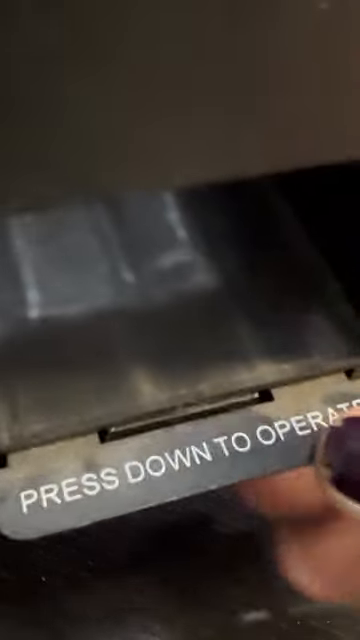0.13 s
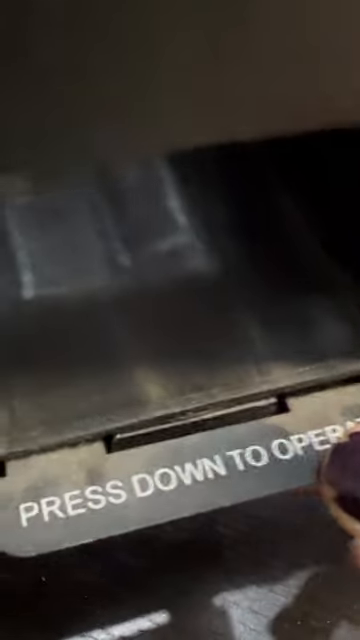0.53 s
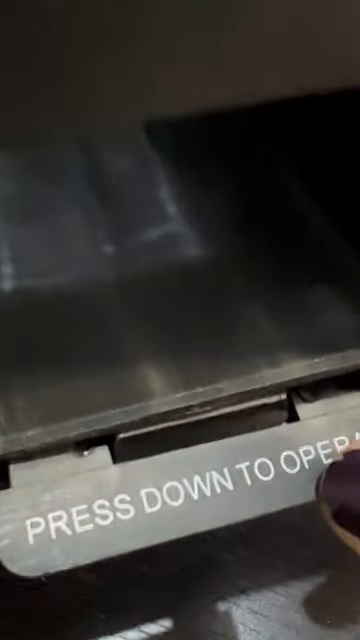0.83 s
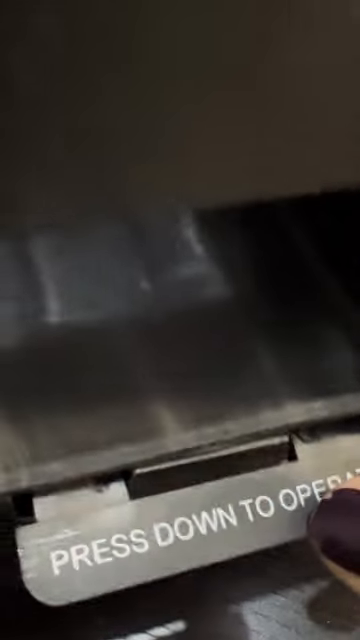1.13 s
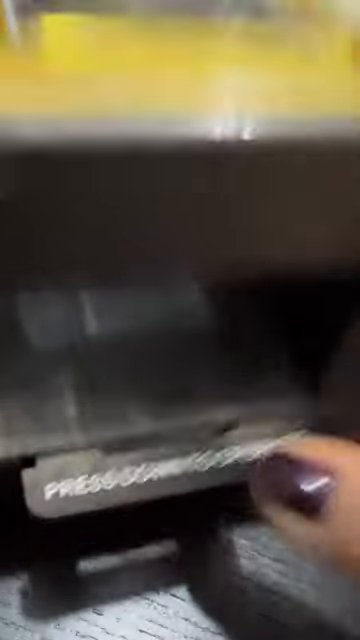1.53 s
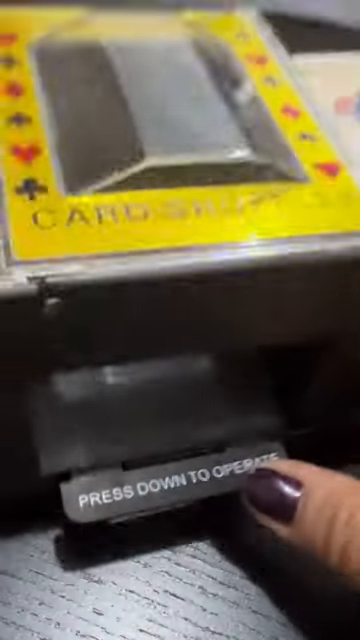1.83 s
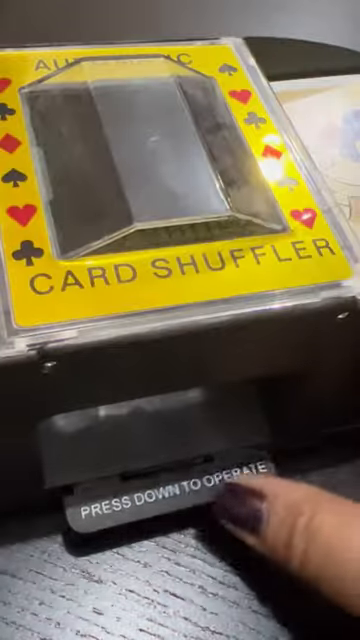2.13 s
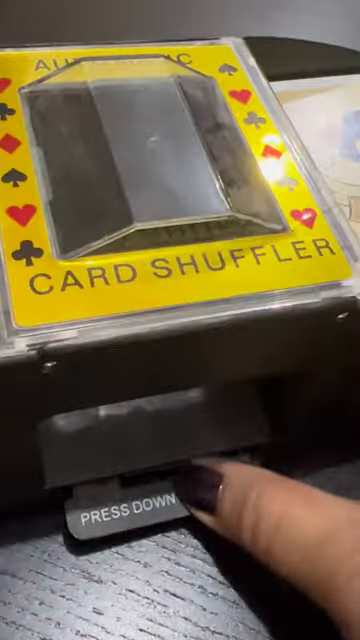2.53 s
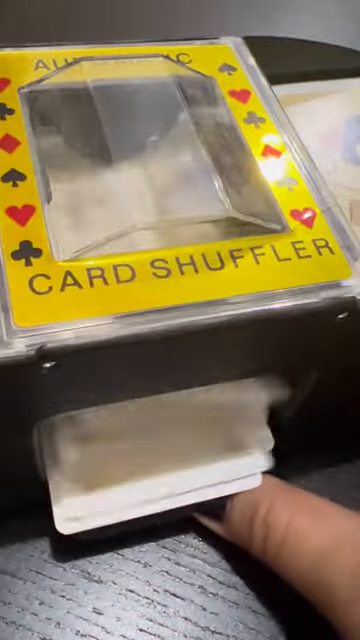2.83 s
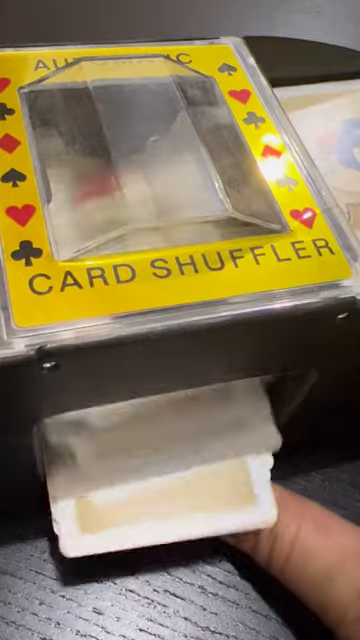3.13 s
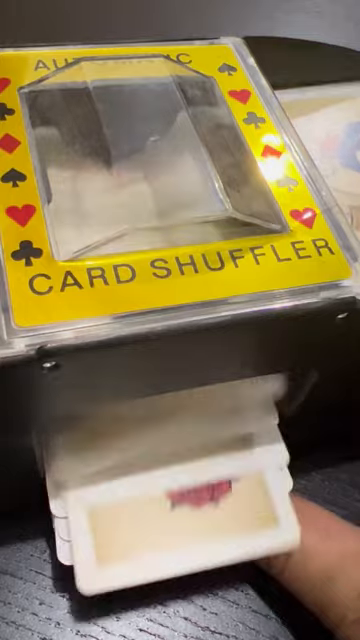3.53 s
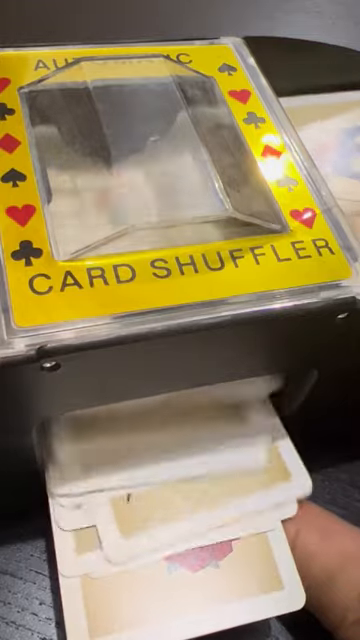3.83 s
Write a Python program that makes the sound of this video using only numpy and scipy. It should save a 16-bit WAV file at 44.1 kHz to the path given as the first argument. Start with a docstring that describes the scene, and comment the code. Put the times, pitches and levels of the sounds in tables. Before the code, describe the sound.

A battery card shuffler, heard close on a phone in a quiet room. Light plastic taps and faint hand rubbing run from 0 to 1.4 s, with a clack at 1.47 s and tiny high squeaks around 1.4-1.7 s. Hard hollow knocks hit the table at 1.92-2.02 s, then near quiet. At about 2.54 s the motor bursts in, rattling and scraping, with irregular papery card snaps until the end at 4 s.

```python
"""A hand slides over plastic in a quiet room and fingers tap and shift the housing of a battery card shuffler.
It stands on a table, close to a hand-held phone, and knocks down hard on the table top; small squeaks sound high.
Then the lever starts the motor: gears rattle the housing while feed wheels scrape and flick cards into the tray.
Noise bursts and gear clicks ring the decaying modes of housing and table; slides and scrapes are coloured noise."""
import sys
import numpy as np
from scipy import signal
from scipy.fft import rfft, irfft
from scipy.io import wavfile
from scipy.ndimage import uniform_filter1d

SR = 44100
rng = np.random.default_rng(int(sys.argv[2]) if len(sys.argv) > 2 else 0)


def gain_from_db(level_db):
    """Turn a decibel level (scalar or array-like) into a linear amplitude factor."""
    decades = np.asarray(level_db, float) / 20
    return 10 ** decades


def store_pcm(level_fs):
    """Save levels as 16-bit WAV."""
    pcm = np.round(np.clip(level_fs, -1, 1) * 32767).astype(np.int16)
    wavfile.write(sys.argv[1], SR, np.atleast_2d(pcm).T)


N = 176400

# modes of the table top, before any damping: (pitch [Hz], level [dB], decay time t60 [s])
TABLE_MODES = [(79.6, -7, 0.28), (115, 1.5, 0.14), (144.5, 1, 0.48), (201, -7, 0.03), (275, 13.5, 0.028)]
# motor drive: (time [s], gear rattle level [dB], card scrape level [dB])
MOTOR_DRIVE = [(2.52, -70, -50), (2.538, -25, -30), (2.548, -15, -20.5), (2.568, -11, -20.5),
               (2.61, -16, -18.5), (2.63, -22, -21), (2.8, -21.5, -26), (2.86, -19, -22.5),
               (2.98, -22, -26), (3.12, -24.5, -21), (3.18, -25, -25), (3.26, -21, -21.5), (3.34, -23, -26),
               (3.45, -24, -23), (3.56, -23.5, -23.5), (3.62, -25, -27), (3.68, -24, -23.5),
               (3.85, -27, -25.5), (4., -26.5, -24.5)]
GEAR_DAMPING = 0.47  # share of the housing's free decay time left while the gears run


def curve(table, column=1):
    """A table column joined by straight lines in time."""
    rows = np.array(table, float)
    return np.interp(np.arange(N) / SR, rows[:, 0], rows[:, column])


def gain(table, size):
    """Gain per frequency bin from (pitch [Hz], level [dB]) points, joined over log pitch."""
    rows = np.array(table, float)
    hz = np.arange(size // 2 + 1) * SR / size
    return gain_from_db(np.interp(np.log(hz + 1), np.log(rows[:, 0]), rows[:, 1]))


def unit(x):
    """Scale to rms 1."""
    return x / np.sqrt(np.mean(x ** 2))


def walk(rate):
    """Random wander of spread 1; a higher rate [Hz] wanders faster."""
    k = int(SR / rate)
    return unit(uniform_filter1d(uniform_filter1d(rng.standard_normal(N), k), k))


def hiss(colour):
    """Stereo noise of a given colour, wider in the treble."""
    # (pitch [Hz], side level above mid [dB])
    side_levels = [(50, -21), (250, -20), (500, -4), (2000, -6.5), (4000, -2.5), (12000, -5.5)]
    mid = rfft(rng.standard_normal(N)) * gain(colour, N)
    side = rfft(rng.standard_normal(N)) * gain(colour, N) * gain(side_levels, N)
    return unit(np.array([irfft(mid + side, N), irfft(mid - side, N)]))


def patchy(x, db, rate):
    """Each band of a noise flickers on its own, by a spread in dB."""
    # edges of the flickering bands [Hz]
    edges = [20, 700, 1500, 3000, 4500, 6500, 8500, 11000, 13500, 19000]
    spectrum = rfft(x)
    hz = np.arange(N // 2 + 1) * SR / N
    out = np.zeros_like(x)
    for lo, hi in zip(edges, edges[1:]):
        patch = irfft(spectrum * (hz >= lo) * (hz < hi), N)
        out += patch * gain_from_db(db * walk(rate))
    return out


def band(x, lo_hz, hi_hz):
    """Band-pass."""
    return signal.sosfilt(signal.butter(2, [lo_hz, hi_hz], "band", fs=SR, output="sos"), x)


def wide(row, share=0.36):
    """Two partly alike channels from one noise row and its reverse."""
    return row + share * row[::-1] * np.array([[1], [-1]])


def burst(rise, fall, size=4096):
    """Envelope that swells over rise [s], then dies away by a factor e per fall [s]."""
    t = np.arange(size) / SR
    swell = np.sin(np.pi / 2 * np.minimum(t / max(rise, 1e-4), 1)) ** 2
    return swell * np.exp(-np.maximum(t - rise, 0) / max(fall, 1e-4))


def add(out, s, x, db):
    """Mix a sound in, starting at s, with a given peak level."""
    i = int(s * SR)
    x = x[..., :N - i]
    out[:, i:i + x.shape[-1]] += x * gain_from_db(db) / np.abs(x).max()


def ring(x, hz, t60):
    """One decaying mode, struck by x."""
    pole = np.exp(2j * np.pi * hz / SR - np.log(1000) / (t60 * SR))
    return signal.lfilter([1], [1, -pole], x).imag


def table_top(x, damping=1):
    """The table top rings in its own modes; damping scales their decay times."""
    return sum(gain_from_db(db) * ring(x, hz, t60 * damping) for hz, db, t60 in TABLE_MODES)


def housing(x, centre_hz, octaves, damping, tune=0.97):
    """The housing rings near the pitch its contact favours, retuned by load; being small, it gives off no bass."""
    # modes, free of load and damping: (pitch [Hz], level [dB], decay time t60 [s], left above right [dB])
    modes = [(428, -16, 0.013, -1), (502, 7.5, 0.072, -5.5), (566, 11.5, 0.033, 3.5),
             (822, 10.5, 0.024, -5.5), (998, 14, 0.042, -3), (1270, 17, 0.016, 1.5), (1597, 17.5, 0.03, 1),
             (2250, 9.5, 0.018, -1), (2394, 16, 0.03, 1.5), (2550, 11.5, 0.051, 1.5), (3200, 10, 0.022, -4),
             (3470, 11, 0.014, 20), (4800, 4, 0.0077, -13)]
    out = 0
    for hz, db, t60, pan in modes:
        favour = np.exp(-.5 * (np.log2(hz / centre_hz) / octaves) ** 2)
        sides = gain_from_db(np.array([[pan], [-pan]]) / 2)
        out = out + gain_from_db(db) * favour * ring(x, hz * tune, t60 * damping) * sides
    return band(out, 348, 10000)


def room():
    """Low room tone: coloured noise whose level drifts a little."""
    # (pitch [Hz], level per Hz [dB])
    colour = [(25, 9.5), (55, 7.5), (90, -1.5), (269, -1), (451, -7.5), (648, -12), (756, -12),
              (1270, -17.5), (3050, -23), (5000, -36), (8000, -47), (12000, -74), (16000, -90)]
    return hiss(colour) * gain_from_db(-47.5 + 0.21 * walk(9.3))


def hand_slide():
    """The hand slides over case and cards: flickering friction noise that stops as the motor starts."""
    # (time [s], level before flicker and wander [dB])
    levels = [(0., -53), (.09, -64.5), (.13, -75), (.6, -82), (.68, -60), (.76, -72), (.97, -82),
              (1.02, -55.5), (1.07, -83), (1.15, -63.5), (1.23, -58.5), (1.28, -93), (1.34, -56),
              (1.43, -60), (1.47, -36.5), (1.52, -53.5), (1.65, -48), (1.78, -54.5), (1.83, -44),
              (1.9, -75), (1.94, -24), (1.98, -46), (2.02, -34), (2.07, -59.5), (2.17, -65.5), (2.26, -54),
              (2.34, -53), (2.42, -66.5), (2.5, -61)]
    # (pitch [Hz], level per Hz [dB])
    colour = [(400, -8), (800, 8), (2200, 5.5), (4000, 2.5), (8000, 0.5), (15000, -6.5)]
    friction = patchy(hiss(colour), 2.2, 46)
    slide = friction * gain_from_db(curve(levels) + 2 * walk(240))
    return slide * (np.arange(N) < MOTOR_DRIVE[1][0] * SR)


def echo(near):
    """A short dull echo: the near sound convolved with dying low noise."""
    level_db, t60_s, dull_hz = -27, .3, 330
    t = np.arange(SR // 2) / SR
    tail = band(wide(rng.standard_normal(len(t)), 0.14), 83, dull_hz)
    tail = tail * gain_from_db(-60 * t / t60_s) * (t > .006)  # nothing returns in the first 6 ms
    tail = tail / np.sqrt(np.sum(tail ** 2) / 2)
    return gain_from_db(level_db) * signal.fftconvolve(near, tail, axes=1)[:, :N]


def taps():
    """Fingers and knocks rub and strike the housing, which rings, with a brighter crack of noise."""
    # (time [s], ring peak [dB], crack above ring [dB], loudest pitch [Hz], contact [s])
    contacts = [(0.15, -41, -20, 480, 0.004), (0.043, -32.5, -10, 520, 0.0032),
                (0.081, -37, -8, 480, 0.0059), (0.183, -35.5, 8.5, 1050, 0.0039),
                (0.373, -36, -28, 443, 0.0046), (0.555, -24.5, 2.5, 800, 0.0039),
                (0.609, -40.5, -2, 498, 0.0053), (0.628, -34.5, 2, 560, 0.0079),
                (0.669, -30, -8, 447, 0.0042), (0.759, -35, -24, 460, 0.0051),
                (0.89, -31.5, -32, 520, 0.0038), (1.015, -27.5, -32, 690, 0.0032),
                (1.024, -27.5, -23, 537, 0.005), (1.156, -30.5, -12, 503, 0.0047),
                (1.186, -28.5, -12.5, 690, 0.0035), (1.198, -35.5, -14, 475, 0.0032),
                (1.223, -29, -20, 482, 0.0026), (1.284, -32.5, -21, 436, 0.0016),
                (1.358, -34.5, -6, 520, 0.0036), (1.391, -37.5, -9, 555, 0.012),
                (1.427, -41.5, 9, 462, 0.0091), (1.459, -23.5, -3, 1190, 0.01),
                (1.467, -8, -3, 926, 0.0037), (1.641, -44.5, 7, 433, 0.002), (1.73, -33, -17, 453, 0.0039),
                (1.881, -26.5, 9.5, 835, 0.0019), (1.92, -6, -1.5, 450, 0.0054),
                (1.937, -2.5, -3.5, 480, 0.0041), (1.944, -9, -21, 465, 0.0029),
                (1.961, -16, -4, 467, 0.0032), (2.013, -8.5, -46, 1080, 0.0019),
                (2.016, 1, -14.5, 426, 0.00349), (2.059, -44, -10, 420, 0.0045),
                (2.269, -47, 5, 450, 0.0024), (2.48, -40, -2.5, 516, 0.0023)]
    out = np.zeros((2, N))
    for s, db, crack_db, hz, contact in contacts:
        row = rng.standard_normal(4096)
        rub = row * burst(1.2 * contact, contact)
        blow = 1.5 * np.roll(burst(0.00031, 0.00011), int(contact * SR / 2))  # strikes half a contact in
        body = housing(rub + blow, hz, 0.86, damping=.6)
        add(out, s - .002, band(body, hz / 1.64, hz * 1.49), db)
        crack = wide(row) * burst(0.29 * contact, 1.27 * contact)
        crack = band(crack, 700, 4830) + 0.043 * band(crack, 3700, 17400)
        add(out, s - .001, crack, db + crack_db)
    return out


def thumps():
    """Hard blows push the table top into its modes, and it shudders with low noise."""
    # (time [s], table ring peak [dB])
    blows = [(1.219, -41.5), (1.47, -34), (1.92, -22), (1.939, -14.5), (2.015, -19.5)]
    out = np.zeros((2, N))
    size = 16384
    push = burst(0.00865, 0.0015, size)
    for s, db in blows:
        shudder = wide(rng.standard_normal(size), 0.15) * burst(0.0096, 0.019, size)
        add(out, s, band(table_top(push + 0.69 * shudder), 79, 1100), db)
        add(out, s, band(shudder, 84, 700), db + 4.5)
    return out


def squeaks():
    """Small high squeaks of plastic on plastic: short bursts of very narrow noise."""
    # (time [s], peak [dB], pitch [Hz], length [s])
    rubs = [(1.385, -38, 13700, 0.02), (1.654, -34, 14800, 0.006), (1.728, -39, 14000, 0.006),
            (1.466, -29, 6870, 0.016)]
    out = np.zeros((2, N))
    for s, db, hz, length in rubs:
        rub = wide(rng.standard_normal(4096)) * burst(0.0027, length / 2)
        add(out, s, band(rub, .985 * hz, 1.015 * hz), db)
    return out


def gear_teeth():
    """Uneven gear teeth click at random moments, with random strength and sign."""
    per_s, scatter_db = 2600, 4.5
    clicks = rng.random(N) < per_s / SR
    strength = gain_from_db(scatter_db * np.clip(rng.standard_normal(N), -2, 2))
    return clicks * strength * np.sign(rng.standard_normal(N))


def gear_rattle(teeth):
    """The gear teeth ring the housing, at a wandering level."""
    rattle = unit(housing(teeth, 950, 1.35, GEAR_DAMPING))
    return rattle * gain_from_db(curve(MOTOR_DRIVE) + 1.1 * walk(70))


def wheel_scrape():
    """The feed wheels scrape at the decks: flickering coloured noise."""
    # (pitch [Hz], level per Hz [dB])
    colour = [(244, -40), (458, 1.5), (636, -22), (1220, 4.5), (2000, -8.5), (2500, 0), (2950, -14),
              (3670, -7.5), (16000, -16.5)]
    friction = patchy(hiss(colour), 3.2, 47)
    return friction * gain_from_db(curve(MOTOR_DRIVE, column=2) + 1.94 * walk(150))


def table_rumble(teeth):
    """The gear teeth also shake the table top, well below the rattle."""
    rumble = unit(band(table_top(teeth, GEAR_DAMPING / 2), 74, 830))
    return rumble * gain_from_db(curve(MOTOR_DRIVE) - 20.5)


def motor():
    """The running motor: the same teeth drive rattle and rumble, and the wheels scrape."""
    teeth = gear_teeth()
    running = np.arange(N) > MOTOR_DRIVE[0][0] * SR
    return (gear_rattle(teeth) + wheel_scrape() + table_rumble(teeth)) * running


def cards():
    """Each card bends, slips off the wheel with a papery snap and knocks the tray, ringing the housing."""
    # (time [s], snap peak [dB], housing ring above snap [dB])
    flicks = [(2.5863, -15, 6), (2.615, -7, -30), (2.6346, -4.5, 0.5), (2.6535, 1, -8.5), (2.6671, -1, -13),
              (2.7166, -7, -7), (2.726, -16, 10.5), (2.7355, -9, -11), (2.765, -2.5, -18),
              (2.784, -8.5, -32), (2.8454, -29, 5), (2.8613, -1, -8), (2.9061, -6.5, -28),
              (2.9535, -4.5, -11), (3.0054, 1.5, -34), (3.0322, -7, -3), (3.0792, 0.5, -8),
              (3.1175, -4, -5.5), (3.1303, -4.5, -4), (3.1396, -7.5, 0.5), (3.15, -10.5, -4),
              (3.1988, -19, 9.5), (3.2131, -11, 3.5), (3.2509, -13, 4), (3.276, -7.5, 2.5),
              (3.3586, -10.5, -2), (3.425, -12.5, -6), (3.4354, -6.5, 3), (3.4733, -15.5, 6),
              (3.5496, -7.5, 2), (3.5662, -12.5, 4.5), (3.582, -2, -34), (3.645, -3, -2.5),
              (3.664, -5.5, -13), (3.668, -11, -7), (3.689, -15.5, 7), (3.711, -6.5, -11),
              (3.7579, -3.5, -38), (3.78, -3, -39), (3.8173, -2.5, -6.5), (3.8792, -7, -4),
              (3.9403, -21, 6), (3.9944, -4.5, -14)]
    rise_s, fall_s, grit_db = .003, 0.0024, 4
    octaves = 1.22  # reach of the snap to either side of its pitch
    out = np.zeros((2, N))
    for s, db, ring_db in flicks:
        row = rng.standard_normal(4096)
        grit = gain_from_db(grit_db * np.abs(np.roll(row, 99)))
        slip = wide(row * grit) * burst(rise_s, fall_s)
        hz = 3330 * 2 ** (0.31 * row[-2])  # each card snaps brighter or duller
        snap = band(slip, hz / 2 ** octaves, min(hz * 2 ** octaves, 19000))
        add(out, s - .6 * rise_s, snap + 0.27 * band(slip, 960, 19000), db)
        tune = 1 + .03 * row[-1]  # each knock retunes the housing a little
        add(out, s, housing(slip.sum(axis=0), 1600, 0.5, 0.47, tune), db + ring_db)
    return out


def scene():
    """Everything at the shuffler, with a short dull echo, over the room tone."""
    near = hand_slide() + taps() + thumps() + squeaks() + motor() + cards()
    return near + echo(near) + room()


def roll_off(x):
    """The treble ends steeply here."""
    return signal.sosfilt(signal.butter(12, 16680, fs=SR, output="sos"), x)


def record(dry):
    """The phone cuts the deepest bass and the top, and rounds the highest peaks."""
    heard = band(band(dry, 45, 19000), 45, 19000)
    rounded = np.tanh(1.118 * heard)
    low_pass = signal.ellip(8, .2, 50, 15800, fs=SR, output="sos")
    mix = signal.sosfilt(low_pass, rounded) / 1.124
    return roll_off(mix)


dry = scene()
out = record(dry)
store_pcm(out)
```